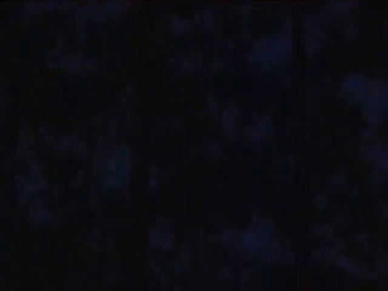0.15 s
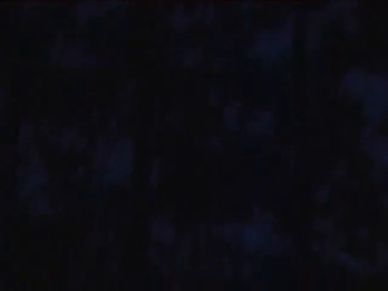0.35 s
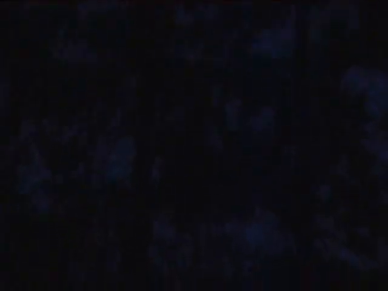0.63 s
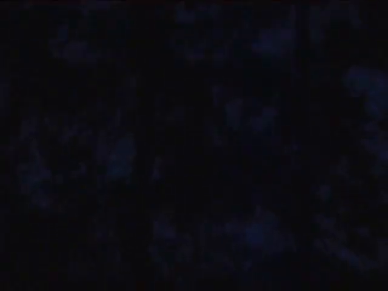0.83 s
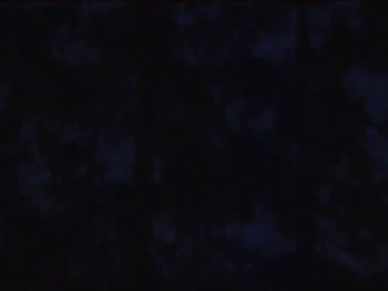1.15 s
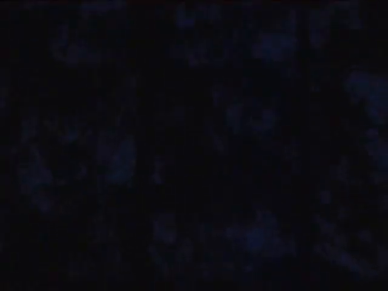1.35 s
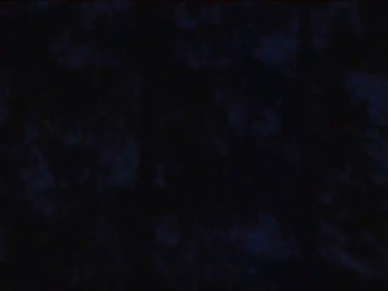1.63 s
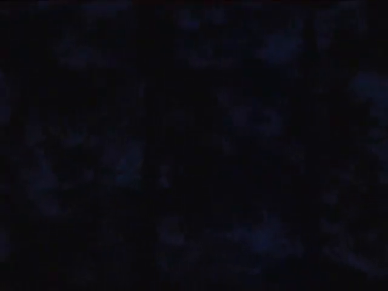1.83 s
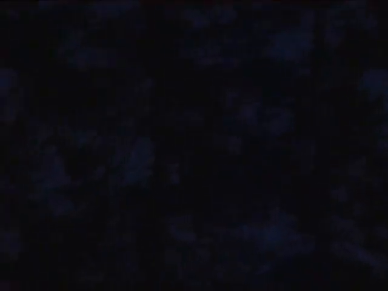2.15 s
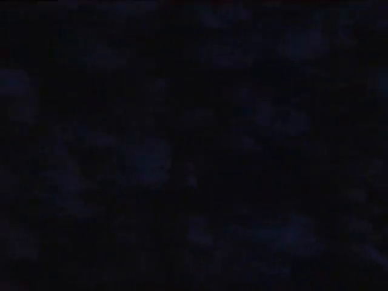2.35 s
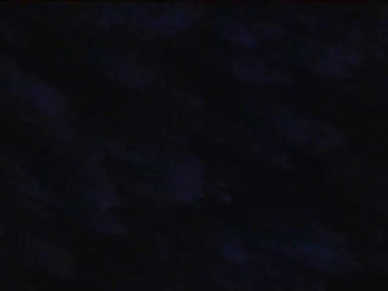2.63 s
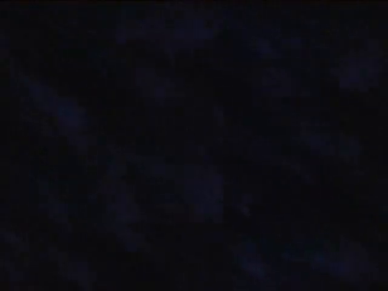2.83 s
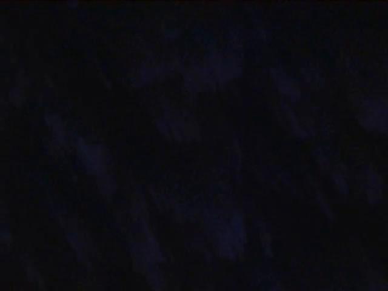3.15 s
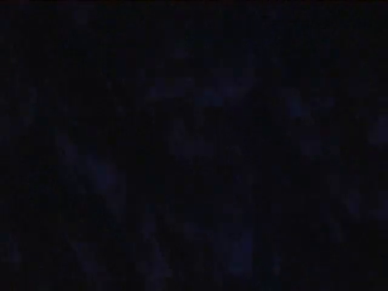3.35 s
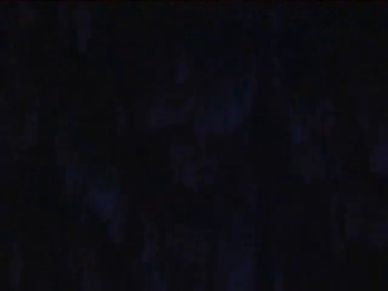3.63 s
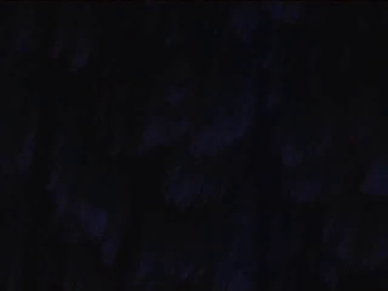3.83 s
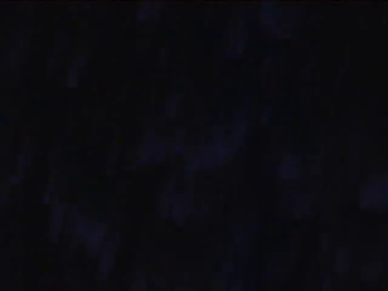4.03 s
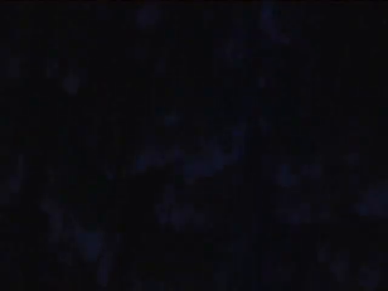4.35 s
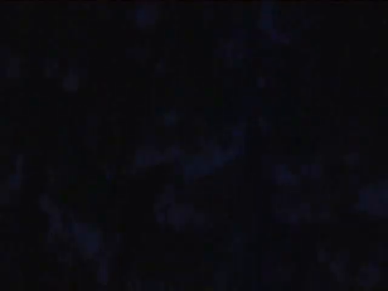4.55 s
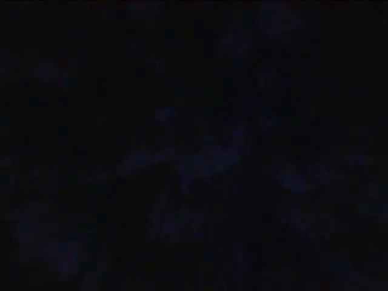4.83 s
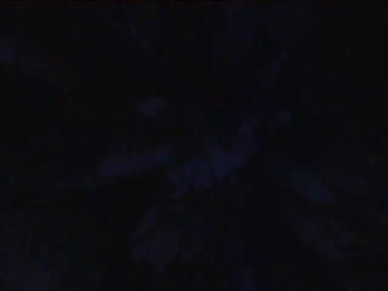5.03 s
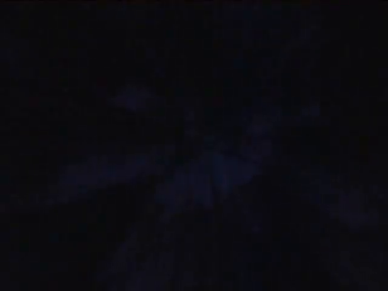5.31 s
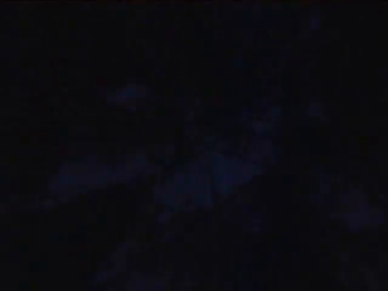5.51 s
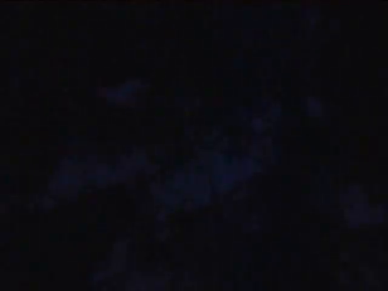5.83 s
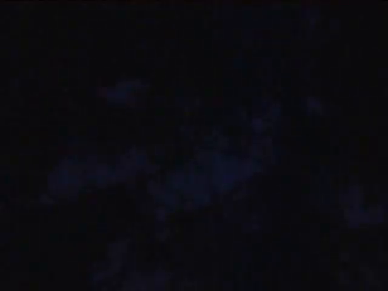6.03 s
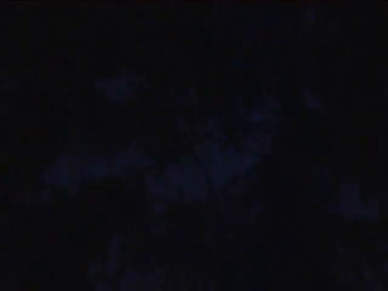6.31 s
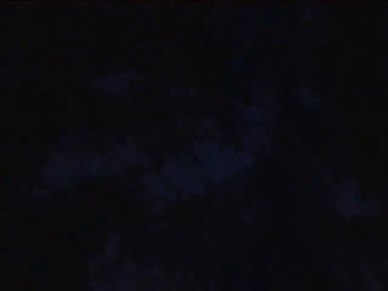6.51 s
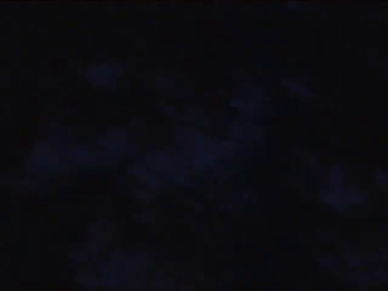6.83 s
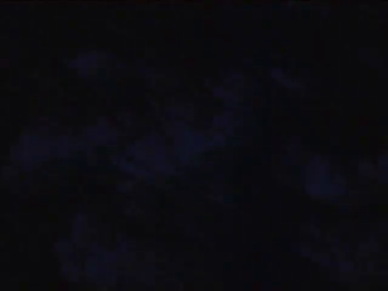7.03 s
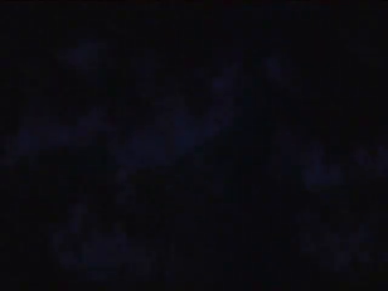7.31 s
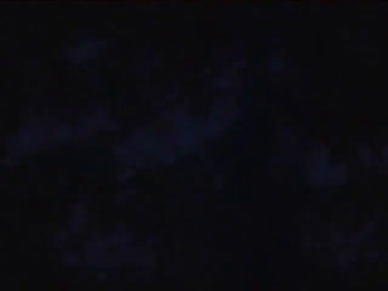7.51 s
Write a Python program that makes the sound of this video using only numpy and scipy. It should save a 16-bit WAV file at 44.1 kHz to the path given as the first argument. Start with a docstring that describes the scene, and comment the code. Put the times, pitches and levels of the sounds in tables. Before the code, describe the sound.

Three sharp, squeaky two-part owl calls, seconds apart, echo off trees over a quiet night bed of distant traffic rumble and faint whine.

```python
"""Three sharp two-part owl calls cut through the night, and scattered wood echoes answer each one.
The owl is a stack of partials on one gliding pitch, shaped by a throat curve, with half partials and breath.
Twigs, drips and clicks are ringing knocks; leaves rustle in a noise band and a far sine whistle rises.
A thin motor whine of locked lines creeps upward over humps of engine drone and banded traffic noise.
A small stereo microphone pair hears it; its converter's gain ripples, putting faint side tones on loud sound."""
import sys
import numpy as np
from scipy import signal
from scipy.io import wavfile
from scipy.ndimage import uniform_filter1d

SR = 44100
rng = np.random.default_rng(int(sys.argv[2]) if len(sys.argv) > 2 else 0)


def digitize_waveform(pressure):
    """Quantize a signal to 16-bit integers and store it at the path in sys.argv[1].

    Rows of a 2-D input are taken as channels; values are limited to [-1, 1].
    """
    field = np.atleast_2d(pressure).T
    bounded = np.clip(field, -1, 1)
    quanta = np.round(bounded * 32767).astype(np.int16)
    wavfile.write(sys.argv[1], SR, quanta)


def invert_db(level):
    """Linear amplitude ratio for a level in decibels (20 dB per decade), elementwise."""
    return 10 ** (np.asarray(level, dtype=float) / 20)


N = 338247

# Owl calls, each a dipping note that breaks up into a loud high one:
# point_s, pitch_hz, effort_db, brightness_db_per_octave (around partial 2)
OWL_CALLS = [
    [(0.121, 1172, -49.5, -4), (0.134, 1247, -45, -1), (0.174, 1126, -52.5, 0), (0.204, 1069, -53.5, 1),
     (0.238, 1086, -49.5, -1), (0.266, 1206, -43.5, 1), (0.286, 1229, -42, 3), (0.292, 1338, -36.5, 3),
     (0.296, 1552, -32.5, 0), (0.306, 1584, -38, -.5), (0.328, 1634, -37, .6), (0.346, 1635, -39.5, 5),
     (0.374, 1556, -32.5, -3), (0.390, 1390, -40.5, -13)],
    [(3.624, 1213, -48.5, -2.5), (3.636, 1283, -43.5, 0.5), (3.668, 1159, -48.5, -1),
     (3.706, 1079, -53, -1), (3.74, 1098, -50, 0), (3.764, 1195, -43.5, -3), (3.782, 1196, -37, -2),
     (3.796, 1365, -38, -1), (3.8, 1570, -40.5, 8), (3.814, 1619, -37, -1), (3.832, 1630, -35, -3.5),
     (3.852, 1608, -37.5, 2.5), (3.88, 1533, -37, -0.5), (3.891, 1387, -37, -10)],
    [(6.756, 1133, -56, -1), (6.768, 1261, -46.5, -3.5), (6.84, 1134, -50, -.6), (6.872, 1140, -48, -3.5),
     (6.904, 1253, -39, -3), (6.922, 1284, -40, 6), (6.934, 1386, -34.5, 4), (6.938, 1624, -34.5, -4),
     (6.947, 1662, -33, -1), (6.966, 1650, -31, -4), (6.969, 1508, -32.5, 5), (7.004, 1495, -32, -0.5),
     (7.016, 1460, -42, 14), (7.028, 1368, -42, 2)],
]
# Owl place, one value per call: left_minus_right_db
OWL_PAN_DB = [-4, -4.5, -4.5]
# Syrinx strength of partials 1-4: level_db
PARTIAL_DB = [-0.2, 1, -1, -4]
# Throat and beak colour of a partial by its frequency: frequency_hz, gain_db
THROAT = [(1080, -3), (1270, -7), (1340, -21), (1440, -22), (1500, -10), (1620, -8.5), (2150, 2),
          (2500, -0.5), (3000, 1), (3300, -1.5), (3700, -0.5), (4200, -4.5), (4500, -1.5), (4900, -4.5),
          (5600, -18.5), (6500, -10.5)]
# Period doubling of a hard-driven syrinx: threshold_db (of partial 3),
# half_partial_db (against the stronger of partials 2 and 3)
DOUBLING = (-41, -28)
# Pitches that linger in the far echo: frequency_hz, width_hz (of the resonance), level_db
ECHO_FAVOURS = [(1630, 60, 8), (3275, 60, 8)]
# Twig snaps, broad and dry: start_s, peak_db (before panning), centre_hz
TWIGS = [(0.772, -49, 3950), (0.924, -45, 2500), (1.691, -45, 2800), (3.542, -50, 4200), (3.997, -47, 4500),
         (4.051, -49, 5270), (4.646, -41.5, 2290), (4.672, -49, 2500), (5.522, -52, 4500)]
# Drips, narrow and pitched: start_s, peak_db (before panning), centre_hz
DRIPS = [(5.482, -48, 1190), (5.502, -48, 1750), (5.522, -39.5, 2040)]
# Faint clicks at random times: from_s, to_s, count, peak_db (before panning), centre_hz, width_hz
CLICKS = (4.8, 5.3, 4, -56, 4900, 1200)
# Motor whine lines: share of the main pitch, relative_level_db
WHINE_LINES = [(.501, 0), (.5145, -3), (.6394, -2), (.6665, -5), (.7505, -3), (.82, -6), (.834, -9),
               (.9865, -10), (1.0, 0), (1.0135, -11), (1.027, -5)]
# Engine drone humps: centre_hz, width_hz (of each resonance pass), level_db (before panning)
DRONE_HUMPS = [(62.1, 4, -69.5), (100, 18, -64.5), (194.6, 12.7, -68), (900, 480, -59.5)]
# Colour of traffic and air: frequency_hz, relative_db_per_hz
NIGHT_COLOUR = [(15, -51), (25, -31), (42, -8), (69, -20), (101, -1), (156, -9.5), (193, -7), (253, -8),
                (281, -8.5), (482, -9), (919, -7), (1490, -16.5), (2770, -20.5), (3340, -24),
                (15500, -33.5)]
# Night level curve, before a fixed lift: time_s, level_db
NIGHT_LEVEL = [(0.0, -54.5), (2.5, -54.5), (4.68, -54), (7.67, -55)]
# Night stereo likeness: frequency_hz, left_right_likeness (0-1)
LIKENESS = [(25, .55), (60, 0.99), (130, 0.83), (290, 0.71), (640, 0.54), (1400, 0.037), (3100, 0.021),
            (6800, 0.27), (15000, 0.43)]
# Night stereo lean: frequency_hz, left_minus_right_db
LEAN = [(60, -3), (240, -3), (950, -2.5), (3770, -0.5), (15000, 0.0)]
# Side tones of the ripple and its overtones at full depth: level_db (against the tone itself)
RIPPLE_DB = [-21, -31, -33]

# Owl: fades outside the first and last points, upper partials, waver and breath
OWL_ATTACK_S, OWL_RELEASE_S, OWL_EDGE_DB = 0.005, 0.005, -22
UPPER_SLOPE_DB = -4   # per partial above the 4th
THROAT_CUT_HZ, THROAT_SLOPE_DB_PER_KHZ = 7150, -16   # extra fade of partials 5-7
WOBBLE_DB, FUNDAMENTAL_WOBBLE_DB = 2.8, 4.5   # rms level waver; the weak fundamental wavers more
PITCH_JITTER = 0.003   # rms share of the pitch
BREATH_DB = -30   # against the stronger of partials 2 and 3

# Wood: near echoes, and a far tree line that answers longer and fainter
WOOD_T60_S, WOOD_DB, FIRST_ECHO_S = 0.27, -14, 0.008
FAR_T60_S, FAR_DB = 0.8, -14.5
LEAF_CUT_HZ = 4500

# Small sounds
TWIG_WIDTH_HZ, TWIG_T60_S, TWIG_PAN_DB = 4000, 0.017, -1.5
DRIP_WIDTH_HZ, DRIP_T60_S, DRIP_PAN_DB = 400, 0.02, -4
RUSTLE_PEAK_S, RUSTLE_DB, RUSTLE_HZ = 2.98, -58.5, 1750
RUSTLE_SWELL_DB_PER_S, RUSTLE_FADE_DB_PER_S = 26, 180
WHISTLE_START_S, WHISTLE_LENGTH_S, WHISTLE_EDGE_S, WHISTLE_DB = 2.87, 0.15, 0.03, -68
WHISTLE_START_HZ, WHISTLE_END_HZ, WHISTLE_RISE_S = 1250, 2700, 0.12

# Whine: the main line settles towards its running pitch as it comes up in level
WHINE_START_HZ, WHINE_END_HZ, WHINE_SETTLE_S = 2550, 2792, 3.0
WHINE_START_DB, WHINE_END_DB, WHINE_SWELL_S = -82, -72.5, 1.8

# Converter ripple; grit is its random part, a hiss around loud tones
RIPPLE_HZ, RIPPLE_FULL_DB, GRIT_DB = 3906, -43, -27


def rms_one(x):
    """Scale to rms 1."""
    return x / np.sqrt(np.mean(x ** 2) + 1e-20)


def in_time(rows):
    """Columns of a curve read at every sample."""
    s, *columns = np.transpose(rows)
    return [np.interp(np.arange(N) / SR, s, c) for c in columns]


def at_hz(points, hz):
    """Read a spectrum on a log-frequency axis."""
    points = np.array(points)
    return np.interp(np.log(hz), np.log(points[:, 0]), points[:, 1])


def drift(rate_hz):
    """Random wander of rms 1: noise through two equal one-pole lowpasses, run at SR / 40."""
    r = np.exp(-80 * np.pi * rate_hz / SR)
    noise = rng.standard_normal(N // 40 + 2002)
    slow = signal.lfilter([1], [1, -2 * r, r * r], noise)[2000:]
    return np.interp(np.arange(N) / 40, np.arange(len(slow)), rms_one(slow - slow.mean()))


def settle(start, end, seconds, since_s=0):
    """Exponential glide from start towards end with a time constant."""
    elapsed = np.maximum(np.arange(N) / SR - since_s, 0)
    return end + (start - end) * np.exp(-elapsed / seconds)


def panned(x, pan_db):
    """Two channels with a level difference."""
    return np.array([x * invert_db(pan_db / 2), x * invert_db(-pan_db / 2)])


def resonance(x, hz, width_hz):
    """Two-pole resonance, gain about 1 on top."""
    r = np.exp(-np.pi * width_hz / SR)
    top = (1 - r * r) / 2
    return signal.lfilter([top, 0, -top], [1, -2 * r * np.cos(2 * np.pi * hz / SR), r * r], x)


def partial_levels(pitch, effort_db, bright_db):
    """Syrinx strength, brightness and throat colour set partials 1-4; 5-7 step down from the 4th."""
    levels = []
    for k, db in enumerate(PARTIAL_DB):
        tilt_db = bright_db * np.log2((k + 1) / 2)
        levels.append(effort_db + db + tilt_db + at_hz(THROAT, (k + 1) * pitch))
    for k in (1, 2, 3):
        khz_above = np.maximum(0, (4 + k) * pitch - THROAT_CUT_HZ) / 1000
        levels.append(levels[3] + UPPER_SLOPE_DB * k + THROAT_SLOPE_DB_PER_KHZ * khz_above)
    return levels


def owl():
    """Wavering partials on one pitch, coloured by the throat; hard effort brings up half partials."""
    out, pan_db = np.zeros(N), np.zeros(N)
    waver, tremble = [drift(69) for k in range(8)], drift(230)
    breath_band = signal.butter(2, [1500, 14000], "band", fs=SR, output="sos")
    air = rms_one(signal.sosfilt(breath_band, rng.standard_normal(N)))
    for rows, call_pan_db in zip(OWL_CALLS, OWL_PAN_DB):
        first, last = np.array(rows[0]), np.array(rows[-1])
        fade_in = first + [-OWL_ATTACK_S, 0, OWL_EDGE_DB, 0]
        fade_out = last + [OWL_RELEASE_S, 0, OWL_EDGE_DB, 0]
        rows = [fade_in, *rows, fade_out]
        on = slice(round(rows[0][0] * SR), round(rows[-1][0] * SR))
        pitch, effort_db, bright_db = [c[on] for c in in_time(rows)]
        levels = partial_levels(pitch, effort_db, bright_db)
        phase = 2 * np.pi * np.cumsum(pitch * (1 + PITCH_JITTER * tremble[on])) / SR
        voice = 0
        for k, db in enumerate(levels):
            wobble_db = WOBBLE_DB if k else FUNDAMENTAL_WOBBLE_DB
            voice = voice + invert_db(db + wobble_db * waver[k][on]) * np.sin((k + 1) * phase)
        strongest_db = np.maximum(levels[1], levels[2])
        threshold_db, half_db = DOUBLING
        # below the threshold, half partials drop 2 dB further per dB
        doubled_db = half_db + np.minimum(0, 2.0 * (levels[2] - threshold_db))
        halves = invert_db(strongest_db + doubled_db) * (np.sin(1.5 * phase) + np.sin(2.5 * phase))
        out[on] = np.sqrt(2) * (voice + halves) + invert_db(strongest_db + BREATH_DB) * air[on]
        pan_db[on] = call_pan_db
    return out, pan_db


def wood(x):
    """Scattered echoes off trunks: sparse, then a dense dying tail, duller and partly its own per ear."""
    t = np.arange(round(1.2 * SR)) / SR
    per_s = 800 + 9000 * t
    struck = rng.random((2, len(t))) < per_s / SR
    hits = struck * rng.standard_normal((2, len(t))) / np.sqrt(per_s) * (t > FIRST_ECHO_S)
    near = hits * invert_db(-60 * t / WOOD_T60_S)
    far = hits * invert_db(FAR_DB - 60 * t / FAR_T60_S)
    lingering = sum(invert_db(db) * resonance(far, hz, width_hz) for hz, width_hz, db in ECHO_FAVOURS)
    echoes = near + far + lingering
    crossed = echoes + 0.5 * echoes[::-1]   # each ear also hears half of the other side
    echoes = signal.lfilter(*signal.butter(1, LEAF_CUT_HZ, fs=SR), crossed)
    echoes = echoes / np.sqrt(np.sum(echoes ** 2) / 2)
    return invert_db(WOOD_DB) * signal.fftconvolve(x[None], echoes, axes=1)[:, :N]


def snaps(rows, width_hz, t60, pan_db):
    """Each snap is a click and a few ms of dying noise, ringing around its own centre."""
    out, t = np.zeros(N), np.arange(1800) / SR
    for (start_s, peak_db, hz), noise in zip(rows, rng.standard_normal((len(rows), len(t)))):
        knock = (t == 0) + 0.33 * noise * invert_db(-60 * t / t60)
        snap = resonance(resonance(knock, hz, width_hz), hz, width_hz)
        i = round(start_s * SR)
        out[i:i + len(t)] += invert_db(peak_db) * snap / np.abs(snap).max()
    return panned(out, pan_db)


def ticks():
    """Broad twig snaps, narrow ringing drips and a scatter of faint high clicks."""
    from_s, to_s, count, peak_db, hz, width_hz = CLICKS
    click_rows = [(s, peak_db, hz) for s in rng.uniform(from_s, to_s, count)]
    twigs = snaps(TWIGS, TWIG_WIDTH_HZ, TWIG_T60_S, TWIG_PAN_DB)
    drips = snaps(DRIPS, DRIP_WIDTH_HZ, DRIP_T60_S, DRIP_PAN_DB)
    clicks = snaps(click_rows, width_hz, TWIG_T60_S, TWIG_PAN_DB)
    return twigs + drips + clicks


def rustle():
    """Leaves: lowpassed noise moved up around one centre, swelling to a peak and dying quickly."""
    t = np.arange(N) / SR
    swell_db = RUSTLE_SWELL_DB_PER_S * (t - RUSTLE_PEAK_S)
    fade_db = RUSTLE_FADE_DB_PER_S * (RUSTLE_PEAK_S - t)
    rough = signal.lfilter(*signal.butter(2, 400, fs=SR), rng.standard_normal((2, N)))
    band = rms_one(rough * np.sin(2 * np.pi * RUSTLE_HZ * t))
    return invert_db(RUSTLE_DB + np.minimum(swell_db, fade_db)) * band


def whistle():
    """One far sine, wavering in level, that rises ever more slowly."""
    t = np.arange(N) / SR - WHISTLE_START_S
    hz = settle(WHISTLE_START_HZ, WHISTLE_END_HZ, WHISTLE_RISE_S, WHISTLE_START_S)
    # the fades lie outside the full-level stretch
    shape = np.clip(1 + np.minimum(t, WHISTLE_LENGTH_S - t) / WHISTLE_EDGE_S, 0, 1) ** 2
    tone = np.sin(2 * np.pi * np.cumsum(hz) / SR)
    return panned(shape * invert_db(WHISTLE_DB + 2.5 * drift(30)) * tone, -1.5)


def whine():
    """Motor: thin lines locked to one slowly rising speed, each wavering in level."""
    main_hz = settle(WHINE_START_HZ, WHINE_END_HZ, WHINE_SETTLE_S)
    level_db = settle(WHINE_START_DB, WHINE_END_DB, WHINE_SWELL_S)
    phase = 2 * np.pi * np.cumsum(main_hz * (1 + 0.002 * drift(30))) / SR
    lines = 0
    for share, db in WHINE_LINES:
        line = np.sin(share * phase + rng.uniform(0, 2 * np.pi))
        lines = lines + invert_db(db + 2.5 * drift(8)) * line
    return panned(np.sqrt(2) * invert_db(level_db) * lines, -2.8)


def drone():
    """Far engines: noise gathered into humps by two passes through a resonance."""
    humps = 0
    for hz, width_hz, db in DRONE_HUMPS:
        once = resonance(rng.standard_normal(N), hz, width_hz)
        humps = humps + invert_db(db) * rms_one(resonance(once, hz, width_hz))
    return panned(humps, -2.1)


def night():
    """Traffic and air: bands of stereo noise, each with its own level, slow swell, likeness and lean."""
    out, together = 0, drift(1.0)
    edges = 22 * 2 ** np.arange(0, 9.7, 0.4)
    white = rng.standard_normal((2, 2, N))   # two noise pairs, so neighbouring bands differ
    for k, (low, high) in enumerate(zip(edges, edges[1:])):
        band = signal.butter(2, [low, high], "band", fs=SR, output="sos")
        mid, side = signal.sosfilt(band, white[k % 2])
        hz = np.sqrt(low * high)
        alike = np.clip(at_hz(LIKENESS, hz), 0, 1)
        gain = invert_db(at_hz(NIGHT_COLOUR, hz) + 0.048 * together + 0.35 * drift(2.7))
        pair = np.sqrt(1 + alike) * mid + np.sqrt(1 - alike) * side * [[1], [-1]]
        out = out + gain * pair * panned(np.ones(1), at_hz(LEAN, hz))
    return invert_db(in_time(NIGHT_LEVEL)[0] + 2.5) * rms_one(out)


def scene():
    """Owl, and its echoes leaning right, over the small sounds and the night."""
    voice, pan_db = owl()
    calls = panned(voice, pan_db) + wood(voice) * invert_db([[-1.5], [1.5]])
    small_sounds = ticks() + rustle() + whistle()
    return calls + small_sounds + whine() + drone() + night()


def low_pass(x):
    """Removes everything above the highest recorded frequency."""
    return signal.sosfilt(signal.butter(12, 15680, fs=SR, output="sos"), x)


def record(dry):
    """Converter gain ripples at a fixed rate, deeper on loud sound, so loud tones get side tones."""
    phase = 2 * np.pi * RIPPLE_HZ * np.arange(N) / SR
    power = uniform_filter1d(np.mean(dry ** 2, axis=0), size=441)   # 10 ms average
    loudness = np.sqrt(np.maximum(power, 0))
    depth = np.tanh(loudness / invert_db(RIPPLE_FULL_DB))
    tones = sum(2 * invert_db(db) * np.cos((k + 1) * phase) for k, db in enumerate(RIPPLE_DB))
    grit = invert_db(GRIT_DB) * rng.standard_normal(N)
    mix = dry * (1 + depth * (tones + grit))
    return low_pass(mix)


dry = scene()
out = record(dry)
digitize_waveform(out)
```